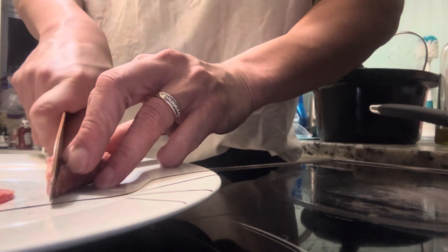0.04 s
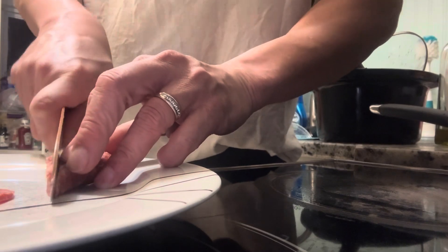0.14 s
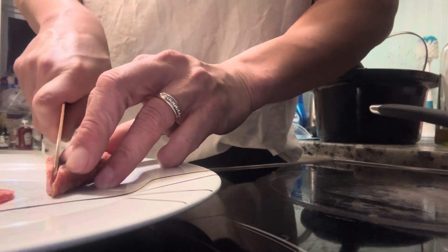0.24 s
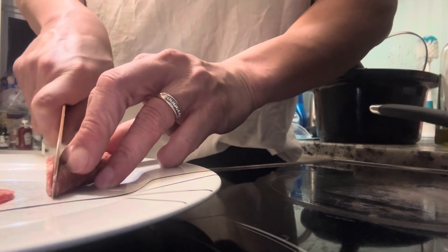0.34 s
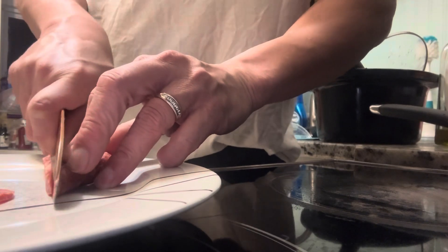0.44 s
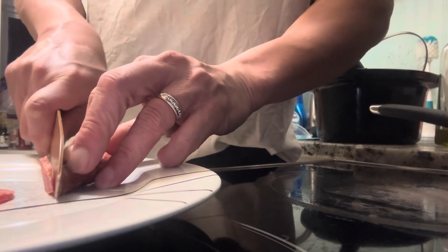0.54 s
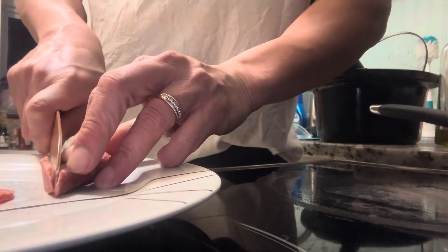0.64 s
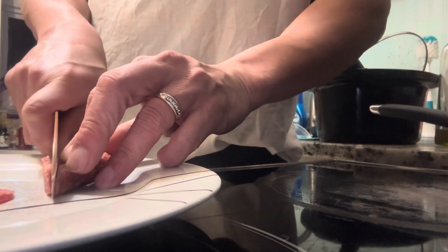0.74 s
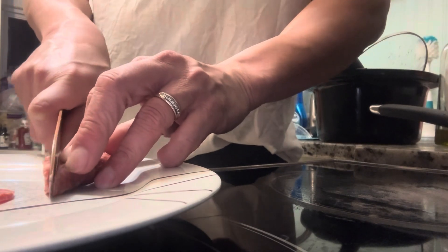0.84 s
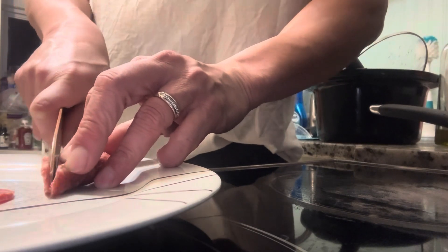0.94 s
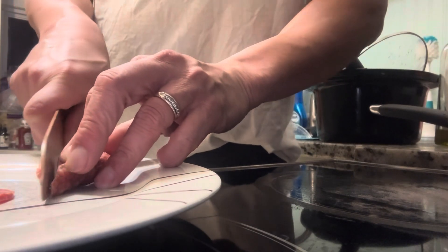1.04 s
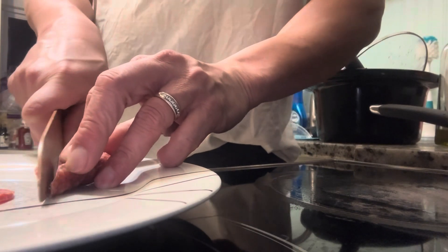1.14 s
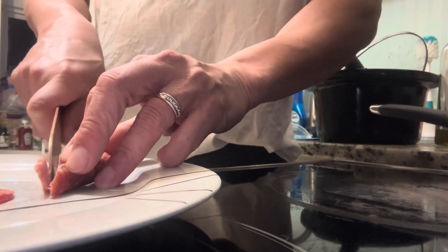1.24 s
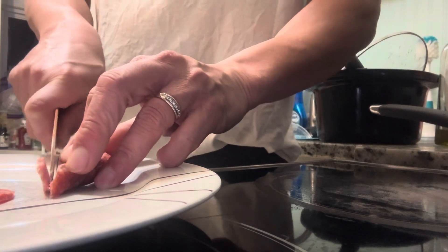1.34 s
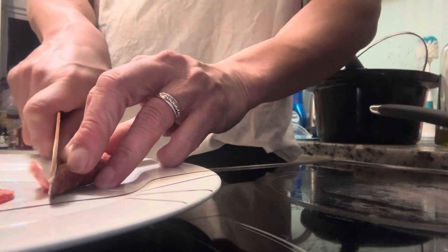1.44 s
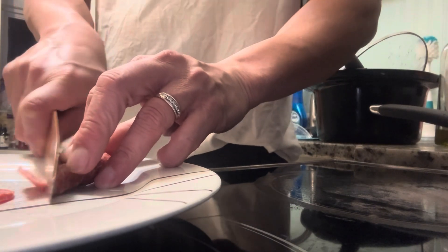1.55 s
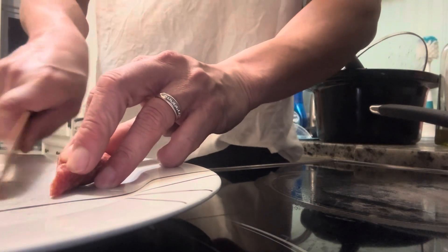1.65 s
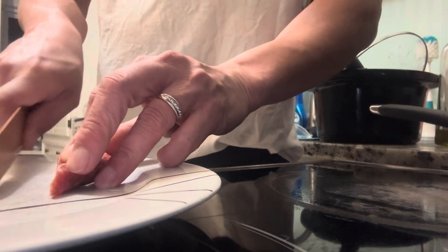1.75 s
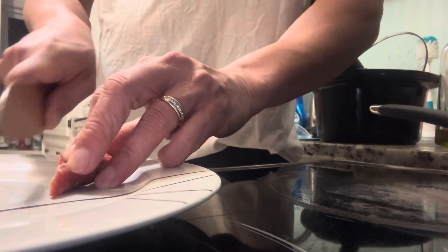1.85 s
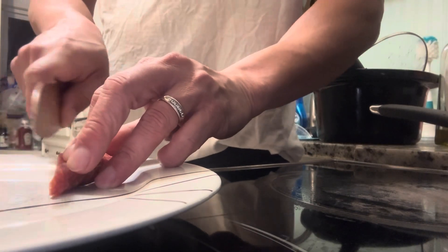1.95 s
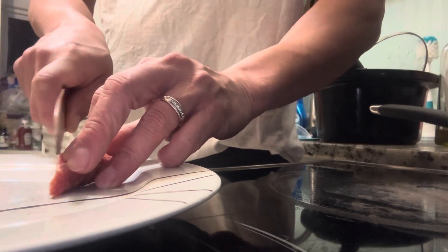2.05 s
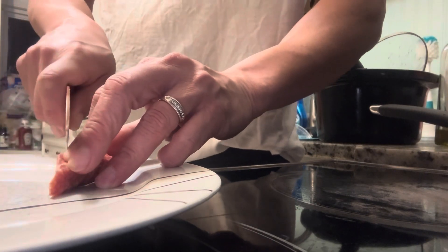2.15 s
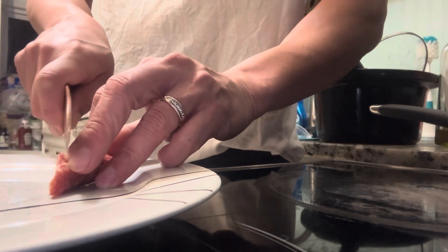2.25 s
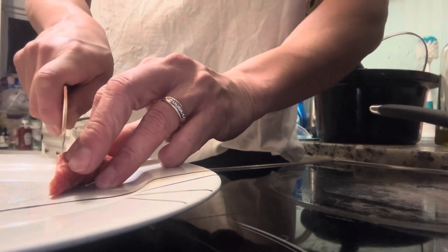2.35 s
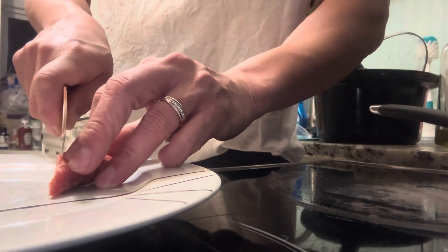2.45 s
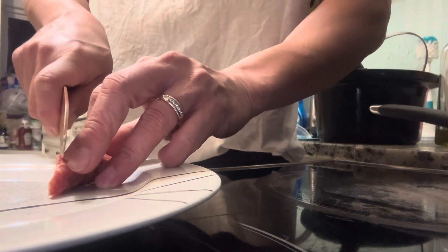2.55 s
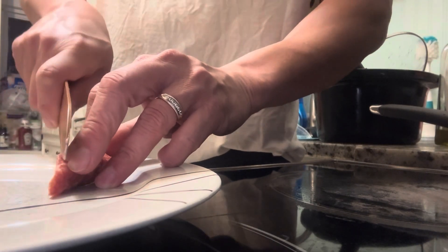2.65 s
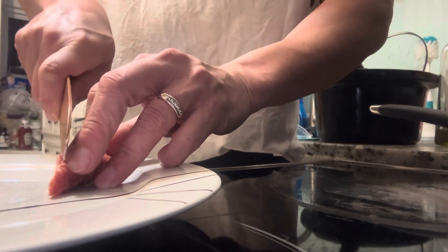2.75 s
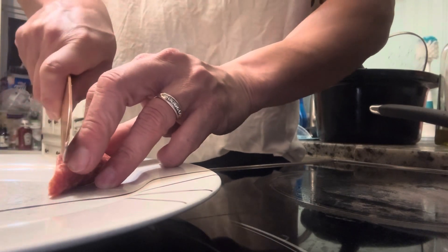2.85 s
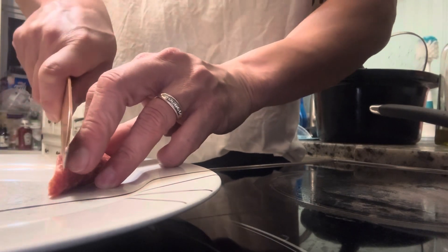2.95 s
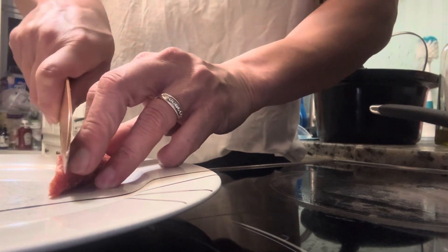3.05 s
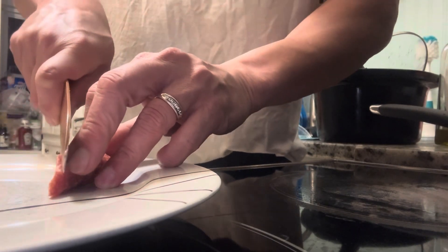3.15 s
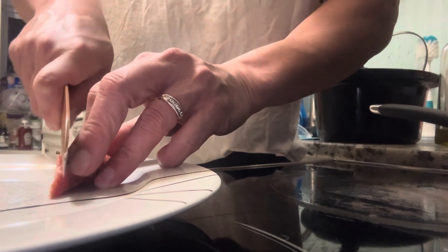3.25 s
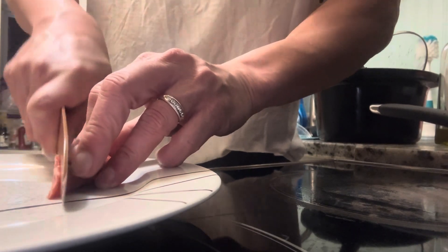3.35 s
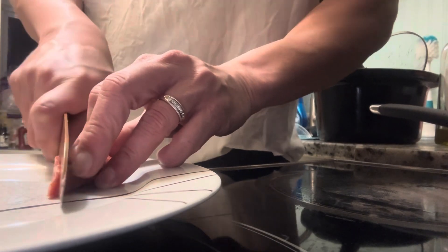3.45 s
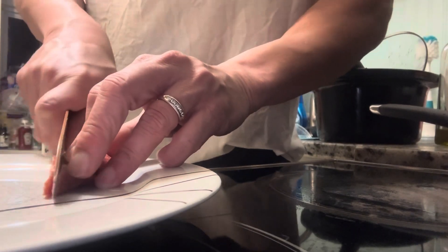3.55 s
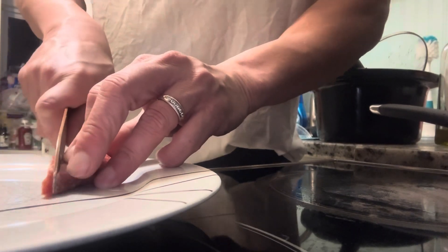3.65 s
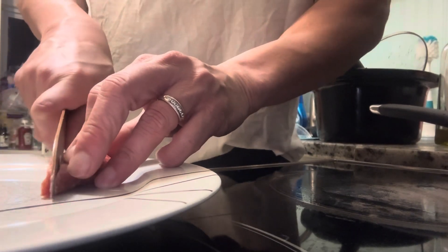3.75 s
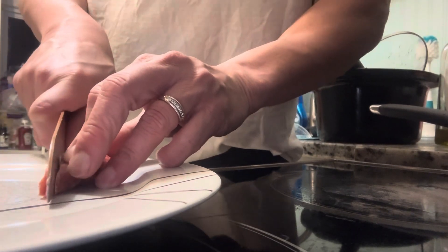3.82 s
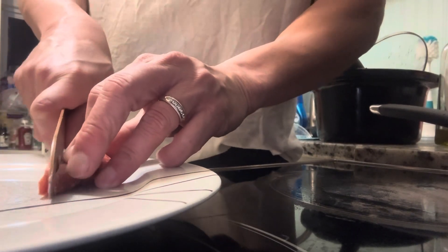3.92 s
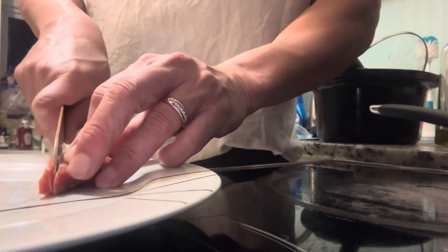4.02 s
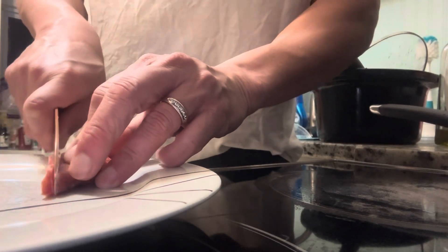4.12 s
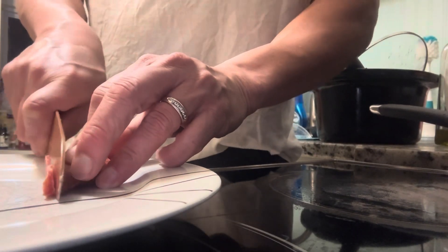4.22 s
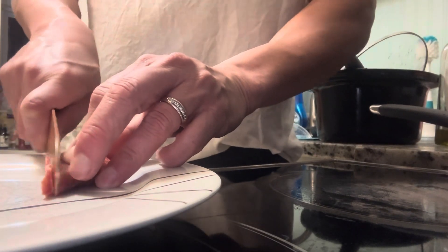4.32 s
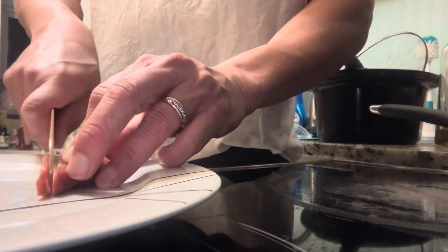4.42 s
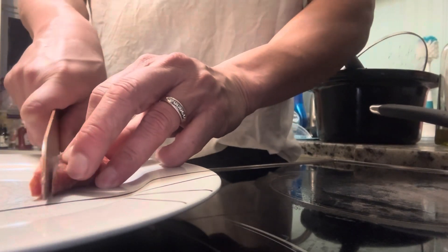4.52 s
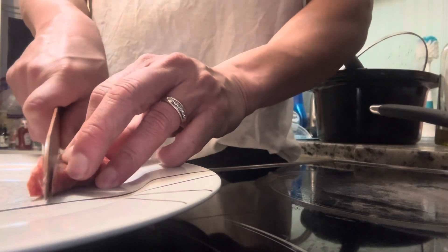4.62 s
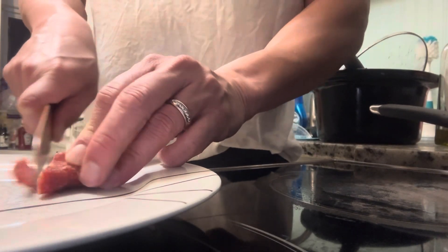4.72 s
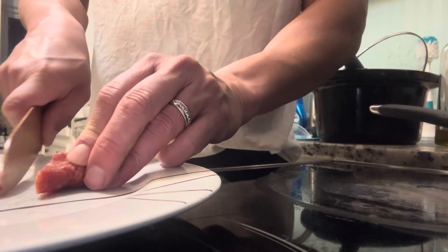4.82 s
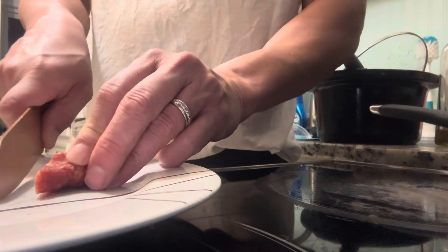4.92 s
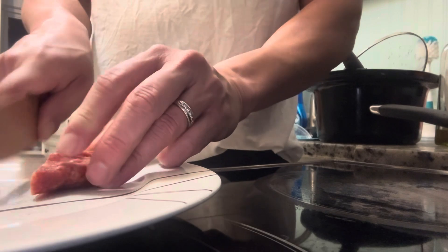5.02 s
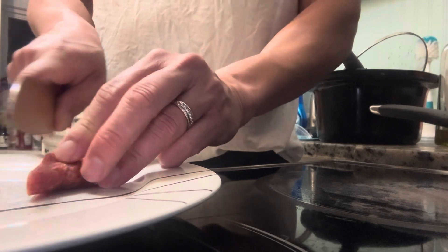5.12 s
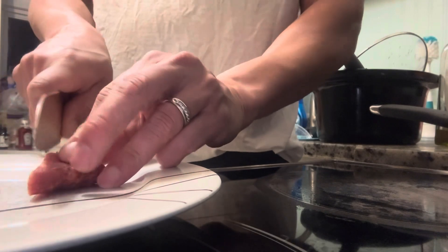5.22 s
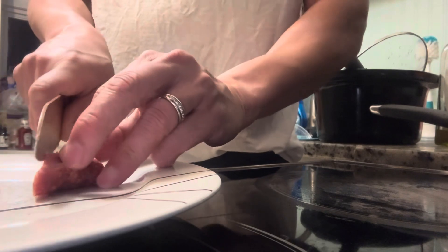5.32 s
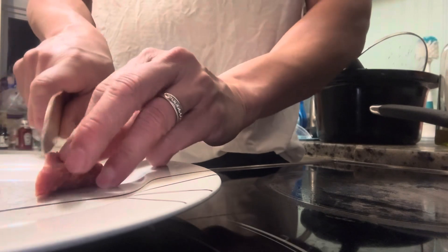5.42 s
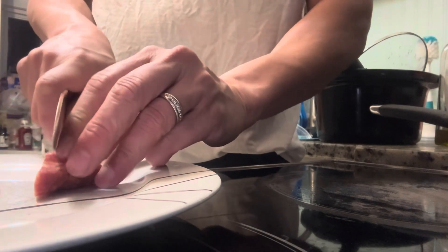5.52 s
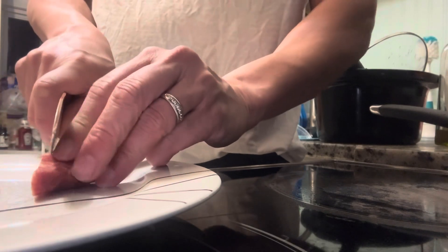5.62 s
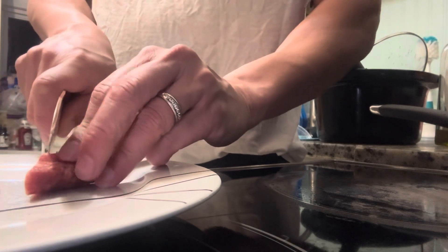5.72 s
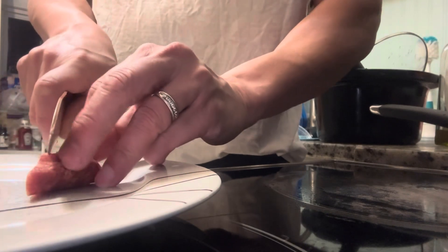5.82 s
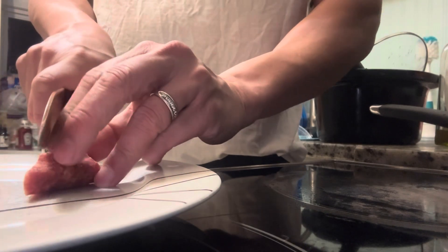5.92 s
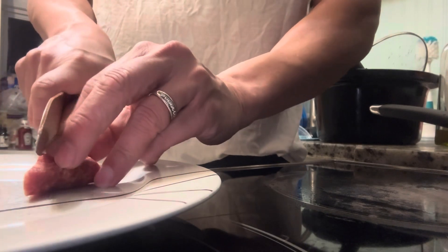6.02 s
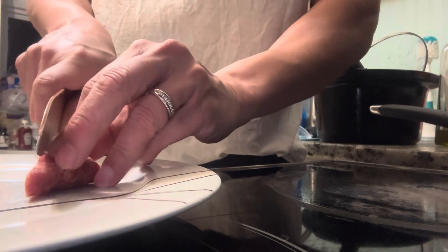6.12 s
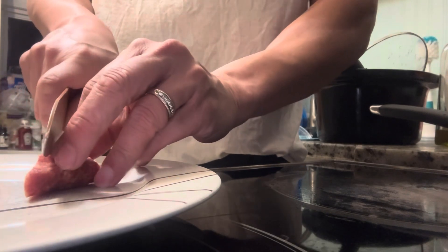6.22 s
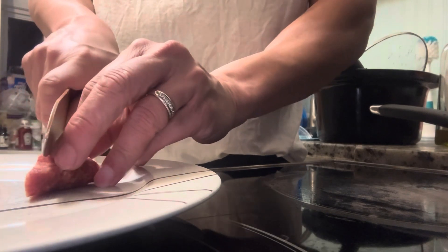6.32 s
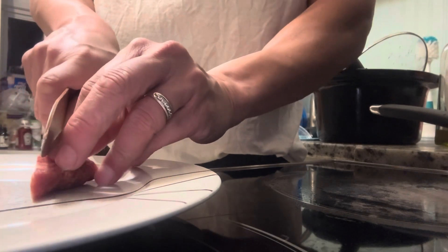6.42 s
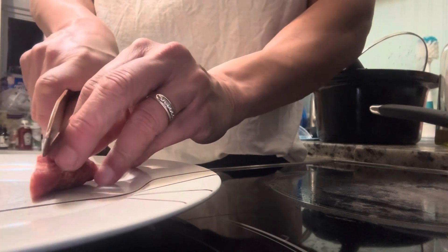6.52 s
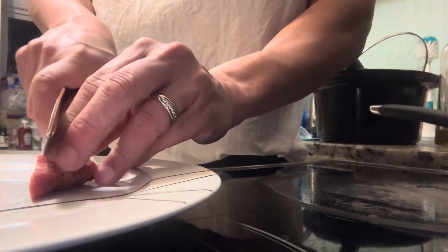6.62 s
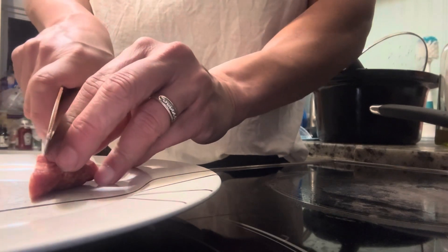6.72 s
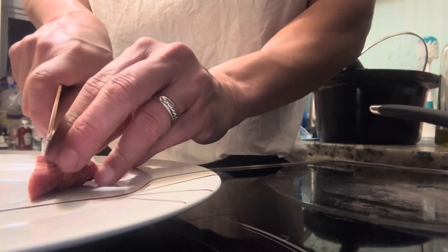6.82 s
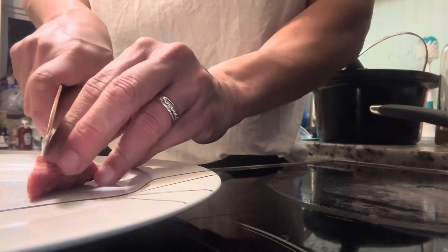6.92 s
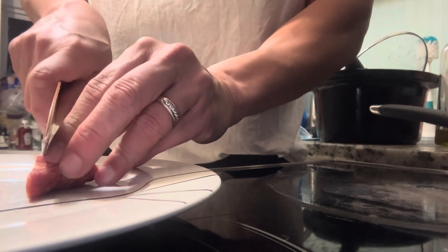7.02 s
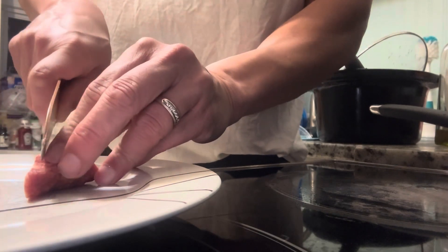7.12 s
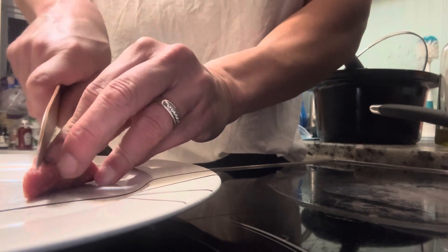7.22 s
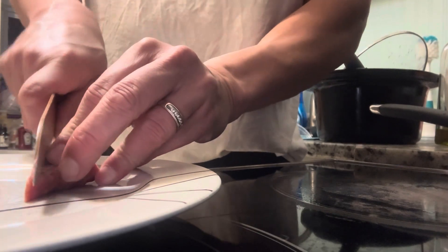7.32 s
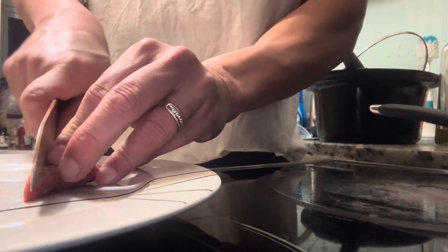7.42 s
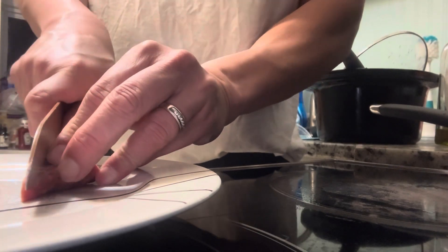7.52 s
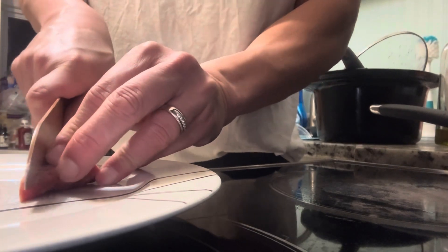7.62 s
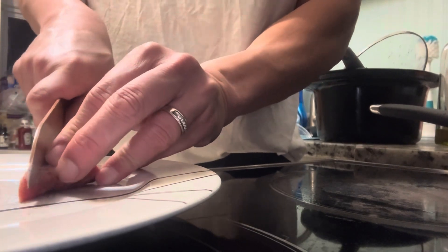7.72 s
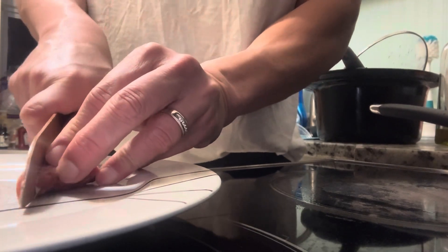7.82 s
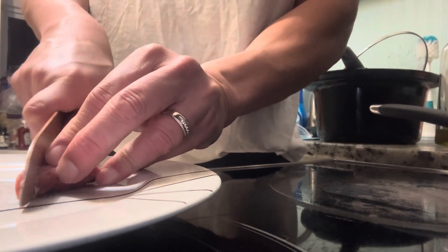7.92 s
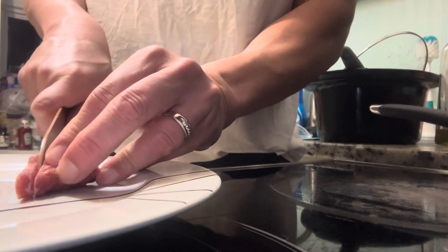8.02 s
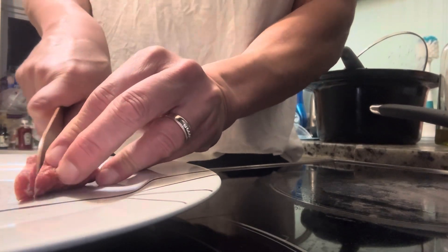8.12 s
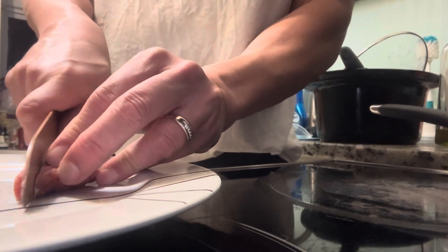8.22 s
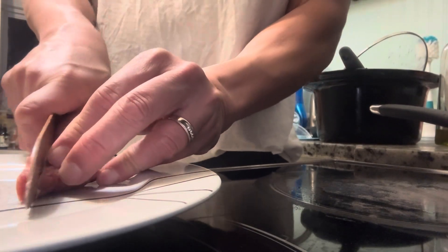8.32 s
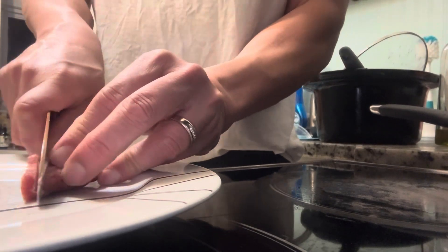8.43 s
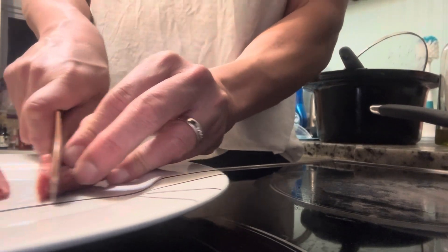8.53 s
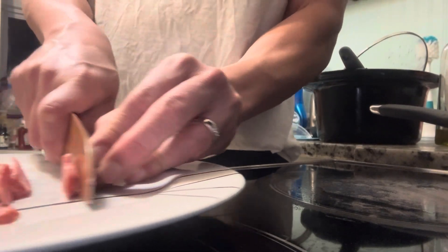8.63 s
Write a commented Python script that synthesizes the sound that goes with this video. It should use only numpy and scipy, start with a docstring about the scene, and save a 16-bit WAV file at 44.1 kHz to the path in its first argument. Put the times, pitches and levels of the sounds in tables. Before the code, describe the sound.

Soft, moist sawing strokes come unevenly as a knife cuts sausage on a plate near the microphone. Early on, a cluster of sharp clicks and a short scrape push a slice aside. More strokes follow with low thumps, small wet snaps and separate knocks of steel on china, then a quieter stretch and a few last clacks. The small kitchen adds a brief ring and a faint steady hum.

```python
"""A kitchen knife saws slowly through a sausage on a china plate on a glass cooktop, close up.
Over a low hum, the hands rumble, the blade rubs through meat, pushes thump the cooktop, the casing
snaps. From 1 s the edge knocks and squeaks and the plate rocks; near 1.55 s the blade sweeps the
slice aside. More strokes follow, dragging over the glaze; the plate's foot ticks at 4.4 s and twice
around 8 s. The small kitchen rings briefly throughout."""
import sys
import numpy as np
from scipy import signal
from scipy.fft import rfft, irfft, next_fast_len
from scipy.io import wavfile
from scipy.ndimage import uniform_filter1d

SR = 44100
rng = np.random.default_rng(int(sys.argv[2]) if len(sys.argv) > 2 else 0)


def store_wav(level_fs):
    """Save 16-bit WAV to argv[1]."""
    pcm = np.round(np.clip(np.atleast_2d(level_fs), -1, 1) * 32767)
    wavfile.write(sys.argv[1], SR, pcm.T.astype(np.int16))


N = 381906
TIME = np.arange(N) / SR
# blade and plate pressed together, quickly damped: pitch_hz, level_db, t60_s
PRESSED_MODES = [(1230, -2, 0.016), (1678, -0.5, 0.053), (2097, 3, 0.11), (2275, 4, 0.028),
                 (2760, -7.5, 0.031), (3274, -1.5, 0.036), (3590, -3.5, 0.031), (3940, -2.5, .04),
                 (4030, -3.5, 0.038), (5540, -7, 0.022), (6327, -8, 0.032), (7440, -6.5, 0.013)]


def undb(db):
    """Decibels to gain."""
    return 10 ** (np.asarray(db) / 20)


def unit(x):
    """Scale to rms 1."""
    return x / np.sqrt(np.mean(x ** 2))


def fade(t, t60_s):
    """Exponential decay, 60 dB in t60_s."""
    return np.exp(-np.log(1000) * t / max(t60_s, 1e-3))


def swell(t, peak_s):
    """Rise to 1 at peak_s, then decay."""
    age = t / max(peak_s, .004)
    return (age * np.exp(1 - age)) ** 1.3


def wobble(rate_hz, t=TIME):
    """Smooth random curve, spread near 1."""
    count = int(t[-1] * rate_hz) + 2
    return np.interp(t * rate_hz, np.arange(count), rng.standard_normal(count))


def stereo_noise(shared):
    """Two noises with a common share of power."""
    common, *own = rng.standard_normal((3, N))
    return np.sqrt(shared) * common + np.sqrt(1 - shared) * np.array(own)


def colour(x, points):
    """Minimum-phase filter through (freq_hz, gain_db) points."""
    size = next_fast_len(x.shape[-1] + 4096)
    size += size % 2
    hz, db = np.transpose(points)
    log_hz = np.log(np.fft.rfftfreq(size, 1 / SR) + 1)
    cepstrum = irfft(np.interp(log_hz, np.log(hz), db) * np.log(10) / 20)
    cepstrum[1:size // 2] *= 2
    cepstrum[size // 2 + 1:] = 0
    return irfft(rfft(x, size) * np.exp(rfft(cepstrum)))[..., :x.shape[-1]]


def treble_of(x):
    """The band that brightness acts on."""
    return signal.sosfiltfilt(signal.butter(2, 4800, "high", fs=SR, output="sos"), x)


def add(out, start_s, sound):
    """Mix a sound in at start_s."""
    start = max(int(start_s * SR), 0)
    out[..., start:start + sound.shape[-1]] += sound[..., :N - start]


def pan(db):
    """Channel gains for a left minus right level."""
    return unit(undb(np.array([[db], [-db]]) / 2))


def convolve(x, response):
    """Apply a two-channel impulse response."""
    return signal.oaconvolve(np.atleast_2d(x), response, axes=-1)[:, :N]


def ringing(modes):
    """Decaying modes of a struck body, amplitudes scaled to norm 1."""
    t = TIME[:SR // 6]
    ring = sum(rng.choice([-1, 1]) * undb(db) * fade(t, t60_s) * np.sin(2 * np.pi * hz * t)
               for hz, db, t60_s in modes)
    return ring / np.linalg.norm([undb(db) for _, db, _ in modes])


def background(air_db=-59):
    """Steady room noise under the wavering hum of fridge and mains."""
    # room noise spectrum: freq_hz, gain_db
    spectrum = [(20, -23), (55, -8.5), (130, -13), (350, -4.5), (700, -37.5), (1050, -39), (2000, -42.5),
                (4000, -38), (7500, -37.5), (10500, -72), (13300, -35), (15000, -56.5)]
    # fridge and mains tones: pitch_hz, rms_db
    tones = [(57, -65.5), (118, -63), (3445, -87), (6885, -93)]
    air = unit(colour(stereo_noise(shared=0.079), spectrum)) * undb(air_db + 0.35 * wobble(26))
    hum = 0
    for hz, db in tones:
        amplitude = np.sqrt(2) * undb(db + 2 * wobble(2.3))
        hum += amplitude * np.sin(2 * np.pi * hz * TIME + .6 * wobble(1.8))
    return air + hum


def movement(peak_s, level_db, rise_s, fall_s, drop_db=16.5, roundness=1.1):
    """Gain of one hand movement: speeds up, peaks, slows down."""
    span = slice(*np.searchsorted(TIME, [peak_s - 5 * rise_s, peak_s + 5 * fall_s]))
    away = np.maximum((peak_s - TIME[span]) / rise_s, (TIME[span] - peak_s) / fall_s)
    gain = np.zeros(N)
    gain[span] = undb(level_db - drop_db * away ** roundness)
    return gain


def slips(rate_hz, scatter_db, patchy_db, patch_hz):
    """Stick-slip: tiny uneven clicks that come in patches."""
    clicks = (rng.random(N) < rate_hz / SR) * rng.choice([-1, 1], N)
    sizes = undb(scatter_db * rng.standard_normal(N))
    return unit(clicks * sizes * undb(patchy_db * wobble(patch_hz)))


def tip_echo(x, mean_s=0.00055, roam_s=.00007):
    """The contact point wanders along the blade, so the tip's echo shifts the colour."""
    index = np.arange(N)
    lag = np.abs(mean_s + roam_s * wobble(11)) * SR
    return unit(x + 0.42 * np.interp(index - lag, index, x))


def pressed(force, modes_db, drift_s=.0012):
    """Friction keeps the pressed modes ringing; their pitch drifts as the edge moves."""
    ring = signal.oaconvolve(force, ringing(PRESSED_MODES))[:N]
    drifting = np.interp(TIME + drift_s * wobble(16), TIME, ring)
    return unit(force + undb(modes_db) * unit(drifting))


def plate(force, ring_db, spread_s=0.00063):
    """The plate passes a force on, smeared; blade and china ring on, differently per side."""
    # free modes of blade and plate: pitch_hz, level_db, t60_s
    modes = [(1390, -6, .18), (1546, -4, .12), (1616, -1.5, .14), (1690, -4, .13), (2200, -11, .1),
             (2735, 3, .16), (3175, -5, .16), (3461, -3, .18), (3740, -9, .16), (4080, -13, .14),
             (4620, -9, .2), (5600, -4, .18), (6538, 0, .16), (6616, -1, .16), (7330, -12.5, .2),
             (8635, -13.5, .25), (11700, -19, .2), (12650, -20, .2)]
    t = TIME[:SR // 3]
    hz = np.fft.rfftfreq(512, 1 / SR)
    knots_hz = np.linspace(0, SR / 2, num=90)
    # bending waves of each pitch take their own time to the rim
    delay_s = np.interp(hz, knots_hz, rng.random(len(knots_hz)) * spread_s)
    direct = irfft(np.exp(-2j * np.pi * np.cumsum(delay_s) * hz[1]))
    direct[len(direct) // 2:] = 0
    response = []
    for _ in range(2):
        ring = sum(undb(db) * fade(t, t60_s) * np.cos(2 * np.pi * (pitch_hz * t + rng.random()))
                   for pitch_hz, db, t60_s in modes)
        ring *= undb(ring_db) / np.linalg.norm(ring)
        ring[0] += 1
        response.append(np.convolve(ring, direct))
    return convolve(force, np.array(response))


def sawing():
    """The blade hisses through moist meat; tearing fibres crunch. Returns sound, friction envelope."""
    # blade strokes: peak_s, level_db, rise_s, fall_s, bright_db
    strokes = [(0.01, -40, 0.06, 0.018, -11), (0.165, -50.5, 0.12, 0.065, 1),
               (0.347, -45.5, .08, 0.12, 1.5), (0.76, -59, 0.23, 0.22, 3.5), (1.0, -59.5, 0.067, 0.64, 4),
               (1.246, -49, 0.072, 0.022, -2), (1.39, -48, 0.046, 0.11, 1.5),
               (2.885, -59.5, 0.06, 0.06, 2.5), (2.99, -57, 0.11, 0.25, 3.5),
               (3.274, -47, 0.052, 0.16, -17), (3.38, -47.5, 0.082, 0.15, 7), (3.768, -52.5, 0.02, 0.11, 5),
               (3.897, -48.5, 0.04, 0.041, 1.5), (4.091, -59.5, 0.079, 0.14, 4),
               (4.3, -59, 0.098, 0.3, 4.5), (4.46, -47, 0.038, 0.082, 6), (5.53, -60.5, 0.046, 0.05, -8),
               (5.76, -66.5, 0.026, 0.32, -3.5), (6.34, -60.5, 0.13, 0.088, -1.5),
               (6.691, -65, 0.076, 0.1, -7.5), (7.02, -66.5, 0.084, 0.062, 2),
               (7.219, -53.5, 0.059, 0.16, -6), (7.61, -74, 0.05, 0.1, 7), (7.77, -44.5, 0.042, 0.028, 3.5),
               (7.94, -54, 0.15, 0.12, 7.5), (8.183, -49, 0.17, 0.093, 3), (8.285, -56, 0.019, 0.046, 9)]
    # spectrum of steel on meat: freq_hz, gain_db
    spectrum = [(150, -6.5), (370, 5), (1000, -1), (1350, -0.5), (1780, 3.5), (2050, 0), (2300, 2),
                (2480, -0.5), (2680, 3), (2900, -1), (3200, 1), (3400, 0), (3700, 3), (4300, 0), (4900, -5),
                (5650, -2), (6200, -5), (6800, -4), (7900, -6.5), (8700, -8), (10200, -31), (11800, -18),
                (15500, -36)]
    rub = slips(rate_hz=5000, scatter_db=-0.5, patchy_db=0.5, patch_hz=60)
    crunch = undb(-1) * slips(rate_hz=240, scatter_db=4.2, patchy_db=3, patch_hz=35)
    cut = pressed(tip_echo(unit(colour(rub + crunch, spectrum))), modes_db=-11)
    treble = treble_of(cut)
    force = friction = 0
    for *move, bright_db in strokes:
        gain = movement(*move)
        force += gain * (cut + (undb(bright_db) - 1) * treble)
        friction += gain
    return plate(force * undb(1), ring_db=-17, spread_s=0.00054) * pan(-6), friction


def hands(friction, rest_db=-61.5, effort_db=-23, blur_s=0.033):
    """Fingers and meat shift on the plate: a dull rumble that grows with sawing effort."""
    # changes of grip: peak_s, level_db, rise_s, fall_s
    grips = [(0.01, -37.5, 0.1, 0.082), (0.72, -46.5, 0.17, 0.13), (2.239, -62, .15, 0.19),
             (3.02, -41, 0.065, 0.08), (4.56, -47, 0.13, 0.6), (7.032, -61, 0.088, 0.063),
             (8.58, -43, 0.51, 0.91)]
    # rumble spectrum: freq_hz, gain_db
    spectrum = [(25, -15), (55, -0.5), (90, 2.5), (170, -3.5), (280, -6.5), (450, -12.5), (700, -14.5),
                (1000, -28.5), (2000, -35.5), (5000, -59.5)]
    rumble = unit(colour(stereo_noise(shared=0.062) * undb(4 * wobble(25)), spectrum))
    effort = np.sqrt(np.abs(uniform_filter1d(friction, size=int(blur_s * SR))))
    gripping = sum(movement(*grip) for grip in grips)
    press = undb(rest_db) + np.hypot(undb(effort_db) * effort, gripping)
    return rumble * press * undb(3) * pan(-1.5)


def finger_ticks(level_db=-85):
    """Greasy fingers stick to the meat and let go in faint, scattered ticks."""
    # tick spectrum: freq_hz, gain_db
    spectrum = [(400, -8), (1000, -3), (1800, 0), (2800, -5), (4000, -7), (8000, -14), (10000, -35)]
    t = TIME[:SR // 40]
    ticks = slips(rate_hz=70, scatter_db=2.5, patchy_db=2, patch_hz=5)
    moist = signal.oaconvolve(ticks, rng.standard_normal(len(t)) * fade(t, 0.0047))[:N]
    rustle = tip_echo(colour(moist, spectrum), roam_s=.0002)
    return plate(rustle * undb(level_db), ring_db=-25) * pan(-2)


def flesh_damping(t):
    """Gain of a swing that flesh damps unevenly."""
    return 1 + 0.57 * wobble(230, t)


def thumps(glide_hz=200, glide_s=.0055, knock_hz=258, frame_hz=76, rebound_hz=82.5):
    """Cooktop bending waves: high ones arrive first, the pane swings low, the stove frame follows."""
    # pushes on the plate, and the stove frame swinging back after some of them (1.66, 3.34, 7.83 s): start_s,
    # level_db, pitch_hz, knock_db, pan_db
    pushes = [(0.044, -34, 58.3, -52, -6.5), (0.145, -31, 111.6, -54.5, -9),
              (0.373, -20.5, 100.2, -39.5, -5), (1.032, -31.5, 108.6, -31.5, -4.5),
              (1.274, -29, 95.6, -25.5, 3), (1.612, -27.5, 95, -19.5, -12), (1.664, -30.5, 88.2, -46, -3),
              (2.349, -22.5, 113.5, -31.5, -7), (3.265, -26, 137.8, -25.5, -3),
              (3.344, -19.5, 84.36, -34.5, -9), (3.776, -22, 95.2, -58.5, -8),
              (4.363, -19.5, 93.6, -21.5, -5), (4.908, -30, 111.8, -28.5, -6.5),
              (5.516, -15.5, 114.5, -19, -8), (5.71, -31, 117.4, -44.5, -17),
              (5.922, -20.5, 102.3, -34, -2.5), (6.179, -25.5, 115, -32.5, -4.5),
              (6.642, -23.5, 109.8, -45.5, -2), (7.196, -29.5, 130.4, -19, -3),
              (7.286, -26.5, 103.6, -46.5, -1), (7.767, -18, 88, -29.5, -4.5),
              (7.834, -27.5, 82.2, -42.5, -4), (7.986, -29.5, 111.7, -51, -6),
              (8.385, -23, 126, -36.5, -3.5), (8.523, -28.5, 97.9, -62, -3)]
    out, t = np.zeros((2, N)), TIME[:SR // 3]
    late = np.maximum(t - .053, 0)  # rebound's clock
    for start_s, db, hz, knock_db, pan_db in pushes:
        detune = 1 + 0.04 * rng.standard_normal(2)
        # a soft push builds slowly and hardly starts the fast waves
        hardness = np.clip((knock_db - db + 27.5) / 16, 0, 1)
        cycles = hz * t + hardness * glide_hz * glide_s * (1 - np.exp(-t / glide_s))
        pane = swell(t, 0.025 - 0.011 * hardness) * np.sin(2 * np.pi * cycles) * flesh_damping(t)
        frame = undb(-10) * swell(t, 0.014) * np.sin(2 * np.pi * frame_hz * detune[0] * t)
        rebound_gain = hardness * undb(-0.58 * max(hz - 93.5, 0))  # weaker for higher thumps
        rebound = rebound_gain * swell(late, 0.011) * np.sin(2 * np.pi * rebound_hz * late)
        knock_gain = undb(knock_db + 5) * (1 - np.exp(-t / 0.001)) * fade(t, 0.05)
        knock = knock_gain * np.sin(2 * np.pi * knock_hz * detune[1] * t)
        add(out, start_s, pan(pan_db) * (undb(db) * (pane + frame + rebound) + knock))
    return colour(out, [(100, -1), (135, -2), (165, -11), (200, -4), (250, 1.5)])


def pops(events, t60_s, width_octaves, skirt_db, gain_db):
    """Short noise bursts, each centred on its own pitch."""
    out, t = np.zeros(N), TIME[:SR // 20]
    ratio = 2 ** width_octaves
    for start_s, db, hz in events:
        hump = [(hz / ratio ** 2, 2 * skirt_db), (hz / ratio, skirt_db), (hz, 0),
                (hz * ratio, skirt_db), (hz * ratio ** 2, 3 * skirt_db)]
        burst = colour(rng.standard_normal(len(t)) * fade(t, t60_s), hump)
        add(out, start_s, burst / np.abs(burst).max() * undb(db + gain_db))
    return out


def snaps_and_smacks():
    """Bright snaps, mostly the casing rupturing; the meat lets go with softer wet smacks."""
    # short bright snaps (the casing; the sharp top of the knock at 7.76 s): start_s, level_db, pitch_hz
    bright_snaps = [(0.1595, -43, 3570), (0.632, -49, 4060), (1.1773, -41, 3750), (1.3738, -31.5, 5600),
                    (1.4198, -40, 5403), (2.73, -75, 2500), (3.2914, -53, 5000), (3.7534, -31.5, 3728),
                    (3.836, -37, 4500), (3.893, -35, 3600), (4.4394, -33.5, 7400), (4.6154, -37.5, 2724),
                    (5.0243, -53.5, 6750), (5.4516, -46, 5930), (5.8406, -33, 5890), (5.9205, -35, 6060),
                    (6.0985, -49, 7350), (6.1859, -44.5, 7250), (6.268, -59, 2200), (6.448, -57, 6010),
                    (7.763, -24, 12000), (7.8441, -37, 4030), (8.1903, -37, 3720)]
    # meat parts from blade and plate: start_s, level_db, pitch_hz
    partings = [(0.4374, -49.5, 1150), (0.821, -45.5, 1730), (1.0874, -42.5, 1190), (1.3723, -35.5, 1640),
                (1.4725, -44, 1280), (1.93, -55, 1610), (2.3456, -56.5, 1477), (4.5473, -47.5, 1287),
                (5.8422, -48, 1753), (5.9218, -40, 2325), (8.0395, -44, 1268), (5.518, -48, 1490),
                (7.44, -52, 1609), (8.313, -54, 1680)]
    snaps = pops(bright_snaps, t60_s=0.018, width_octaves=2.3, skirt_db=-7.5, gain_db=-3)
    snaps = colour(snaps, [(8500, 8), (10000, -19.5), (12000, -4.5)])
    smacks = pops(partings, t60_s=0.02, width_octaves=0.55, skirt_db=-13, gain_db=1.5)
    return (plate(snaps, ring_db=-22, spread_s=0.0021) * pan(-2.8)
            + plate(smacks, ring_db=-23.5, spread_s=0.0042) * pan(-1.8))


def clack(low_hz, high_hz, favour_db=10, reach_octaves=0.25):
    """Pressed modes, louder near the two pitches that the contact point favours."""
    modes = []
    for hz, db, t60_s in PRESSED_MODES:
        octaves = min(abs(np.log2(hz / low_hz)), abs(np.log2(hz / high_hz)))
        modes.append((hz, db + favour_db * np.exp(-(octaves / reach_octaves) ** 2), t60_s))
    return ringing(modes)


def knocks(bite_s=.002, clack_lead_s=.001):
    """The edge bites into the glaze, strikes home, chatters and sets blade and plate clacking."""
    # edge meets plate: start_s, chatter_db, body_db, edge_db, approach_t60_s, decay_t60_s,
    # clack_db, low_hz, high_hz
    hits = [(1.0056, -27.5, -37.5, -35.5, 0.004, 0.026, -32, 1688, 3608),
            (1.277, -32, -38, -42.5, 0.012, 0.025, -24, 1676, 3163),
            (1.2872, -43, -50, -46.5, 0.0067, 0.038, -40, 1704, 6463),
            (1.547, -23, -46, -30, 0.062, 0.07, -31, 1596, 5600),
            (1.5605, -26.5, -50, -32.5, .006, 0.016, -31.5, 2812, 5640),
            (1.5813, -13.5, -45.5, -27.5, 0.0042, .022, -19, 1725, 6620),
            (1.64, -23, -39, -33, .006, 0.012, -32.5, 1421, 3500),
            (1.6534, -9, -41, -24.5, .008, 0.015, -11.5, 2816, 3475),
            (3.337, -11.5, -21.5, -19, 0.013, 0.0078, -12.5, 2330, 3170),
            (3.352, -29, -44, -46.5, 0.0071, .04, -30, 2258, 1702),
            (4.36, -13.5, -17.5, -52, 0.0053, 0.014, -13, 1760, 3234),
            (4.3691, -16, -25, -46, 0.005, 0.014, -19.5, 1750, 4095),
            (4.676, -31, -60, -59, .005, .02, -42.5, 1700, 3800),
            (4.6963, -21.5, -58, -44, 0.0071, 0.05, -36, 2100, 2800),
            (4.7383, -38, -66, -49, .005, .02, -45.5, 2300, 3800),
            (7.212, -31.5, -36.5, -51.5, .014, 0.077, -41, 1745, 2830),
            (7.761, -18.5, -25.5, -46, 0.033, 0.035, -15.5, 1317, 1700),
            (7.766, -38.5, -24, -46, 0.042, 0.0083, -28.5, 1700, 2750),
            (7.9801, -30.5, -54, -41.5, 0.0089, 0.018, -39.5, 1660, 2280),
            (8.166, -30, -43.5, -45.5, 0.005, 0.021, -40, 1560, 3700)]
    # chatter spectrum: freq_hz, gain_db
    spectrum = [(150, -3.5), (400, -2.5), (780, -7.5), (980, -12), (1250, -3.5), (1620, 8), (1950, 3),
                (2300, 2), (3200, -1.5), (4000, -4.5), (4900, -10.5), (6600, -14), (8600, -18.5),
                (10000, -39), (13000, -33.5), (15000, -41.5)]
    out, t = np.zeros(N), TIME[:SR // 16] - 1 / 64
    for start_s, chatter_db, body_db, edge_db, approach_s, decay_s, clack_db, low_hz, high_hz in hits:
        pressure = np.where(t < 0, fade(np.abs(t), approach_s), fade(np.abs(t), decay_s))
        force = rng.choice([-1, 1], len(t)) * pressure
        force[np.argmax(pressure)] += undb(-1) * np.linalg.norm(pressure)  # the strike
        chatter = colour(force, spectrum)
        bands = [((120, 1000), body_db + 1), ((1000, 4800), chatter_db - 9), ((4800, 16000), edge_db)]
        for band_hz, db in bands:
            part = signal.sosfilt(signal.butter(3, band_hz, "band", fs=SR, output="sos"), chatter)
            add(out, start_s + bite_s + t[0], unit(part) * undb(db - 9.5))
        add(out, start_s + bite_s - clack_lead_s, clack(low_hz, high_hz) * undb(clack_db))
    return plate(out, ring_db=-24, spread_s=0.00065) * pan(-3)


def squeaks(waver=0.037):
    """The slips lock briefly into a wavering tone."""
    # the wet blade catches: start_s, level_db, pitch_hz, rise_s, t60_s
    catches = [(1.24, -40, 2660, 0.0045, 0.038), (1.546, -24, 1630, .004, 0.029),
               (1.553, -19.5, 2783, 0.0087, 0.017), (1.597, -28.5, 3410, 0.0046, 0.036),
               (2.451, -60.5, 1884, .002, 0.031), (2.487, -53.5, 2006, 0.0033, 0.029),
               (3.893, -34, 3790, 0.0033, 0.031), (4.926, -33, 1694, .005, 0.042),
               (8.27, -52.5, 3480, .015, .1)]
    out, t = np.zeros(N), TIME[:SR // 10]
    for start_s, db, hz, rise_s, t60_s in catches:
        cycles = np.cumsum(hz * (1 + waver * wobble(600, t))) / SR
        envelope = np.minimum(t / rise_s, 1) * fade(np.maximum(t - rise_s, 0), t60_s)
        add(out, start_s, undb(db) * envelope * np.sin(2 * np.pi * cycles))
    return plate(out, ring_db=-34) * pan(-5)


def clunks(rise_s=.0015, t60_s=.055):
    """The plate rocks for a few cycles; its foot rattles dully on the glass."""
    # firm blows that rock the plate: start_s, level_db, pitch_hz
    blows = [(1.28, -15, 303.8), (1.306, -34, 322), (1.616, -13, 290), (1.633, -20.5, 261.7),
             (1.642, -22, 779.3), (3.274, -28.5, 358.4), (3.351, -24.5, 214.4), (3.365, -23.5, 330),
             (4.362, -8, 295), (4.371, -19, 380.2), (5.516, -27.5, 251.9), (7.763, -20.5, 603.6),
             (7.764, -22.5, 340.2), (7.846, -33, 330), (7.863, -29.5, 543), (8.312, -36, 596),
             (8.376, -31.5, 589), (8.395, -34, 696)]
    # rattle spectrum: freq_hz, gain_db
    spectrum = [(160, -12), (240, -1.5), (310, 7), (390, -2.5), (480, -3), (780, -2), (1050, -14.5)]
    rattle = colour(pops(blows, t60_s=0.062, width_octaves=1.4, skirt_db=-12, gain_db=1.5), spectrum)
    rock, t = np.zeros(N), TIME[:SR // 10]
    envelope = np.minimum(t / rise_s, 1) * fade(t, t60_s)
    for start_s, db, hz in blows:
        add(rock, start_s, undb(db + 0.5) * envelope * np.sin(2 * np.pi * hz * t) * flesh_damping(t))
    return rock + plate(rattle, ring_db=-17.5, spread_s=0.0018)


def sweep(start_s=1.546, hold_s=0.079, level_db=-28, growth_db_per_s=23.5):
    """Gain as the freed blade sweeps the slice aside, pressing ever harder."""
    age = TIME - start_s
    attack = fade(np.maximum(-age, 0), t60_s=0.048)
    release = fade(np.maximum(age - hold_s, 0), t60_s=0.076)
    growth_db = growth_db_per_s * np.clip(age, 0, hold_s)
    judder_db = 0.5 * wobble(220)  # the edge catches and lets go
    return attack * release * undb(level_db + growth_db + judder_db)


def scrapes():
    """The edge grates over the glaze, ringing most when no meat damps it."""
    # damped drags of the edge: peak_s, level_db, rise_s, fall_s, bright_db
    drags = [(3.353, -33, .008, 0.05, -21), (4.619, -49, 0.011, 0.086, -3.5),
             (4.703, -39, 0.069, 0.062, -3), (4.755, -41.5, 0.037, 0.07, -9),
             (4.86, -49.5, 0.04, 0.073, -5), (4.93, -48, 0.024, 0.01, -4.5), (8.441, -52, 0.083, 0.19, 0),
             (8.65, -47.5, 0.14, .1, -1.5)]
    # spectrum of steel on glaze: freq_hz, gain_db
    spectrum = [(400, -4.5), (780, -1), (1000, -9.5), (1350, -5), (1650, -0.5), (1900, -8), (2200, 2),
                (2700, -1.5), (3000, -5), (3800, -2.5), (4400, -3.5), (4950, -9.5), (5600, -9.5),
                (6800, -6), (7700, -11.5), (8700, -9), (10200, -45), (11700, -17.5), (15000, -41)]
    fine = slips(rate_hz=3700, scatter_db=4, patchy_db=2.5, patch_hz=130)
    coarse = undb(-2) * slips(rate_hz=280, scatter_db=3, patchy_db=2, patch_hz=240)
    grate = tip_echo(unit(colour(fine + coarse, spectrum)))
    treble = treble_of(grate)
    body = pressed(grate - treble, modes_db=-5.5) * np.std(grate - treble)
    force = sum(movement(*move) * (body + undb(bright_db + 3) * treble) for *move, bright_db in drags)
    damped = plate(force * undb(4), ring_db=-21, spread_s=0.00088) * pan(-2)
    free = plate(grate * sweep(), ring_db=-4.5, spread_s=0.0014) * pan(-2.6)
    return damped + free


def foot_taps():
    """The plate's foot ticks on the glass; the china rings briefly."""
    # foot meets glass: start_s, level_db
    taps = [(4.361, -18), (7.8635, -25.5), (8.378, -40)]
    # modes of the china alone: pitch_hz, level_db, t60_s
    modes = [(580, 5, 0.048), (1215, -6.5, 0.04), (1340, -8, .03), (2275, -2.5, 0.04), (3040, -6.5, .04),
             (4130, -2, .04), (5200, -16, 0.04), (6250, -11, 0.045), (7310, -14, 0.045), (8500, -16.5, .04)]
    out, t = np.zeros(N), TIME[:SR // 20]
    for start_s, db in taps:
        tick = colour(rng.standard_normal(len(t)) * fade(t, .018), [(8000, 0), (10000, -15)])
        add(out, start_s, undb(db - 3) * tick)
        add(out, start_s, undb(db) * ringing(modes))
    return plate(out * undb(-2), ring_db=-21, spread_s=0.001) * pan(-2)


def kitchen(x, gap_s=0.0013, crossover_hz=350):
    """Cupboards and tiles answer after a short gap; the bass lingers longer."""
    t = TIME[:SR // 2]
    response = 0
    for band, t60_s, wet_db in (("high", 0.26, -11), ("low", 0.36, -7)):
        tail = rng.standard_normal((2, len(t))) * fade(t, t60_s) * np.clip(t / gap_s - 1, 0, 1)
        tail *= undb(wet_db) / np.linalg.norm(tail[0])
        response += signal.sosfilt(signal.butter(2, crossover_hz, band, fs=SR, output="sos"), tail)
    return x + convolve(x, response)


def mic_ports(x):
    """Each pitch reaches the two microphone ports with its own balance and phase."""
    # port differences: freq_hz, left_minus_right_db, left_lead_rad
    response = [(30, 1.5, -0.94), (100, -1, -1.44), (248, 0.5, -2.5), (470, -1.5, -4.0), (900, 3, -5.0),
                (1007, 2, -2), (1220, -8, -1), (1480, 2, 1.88), (1864, -2.5, 1), (2400, 4.5, 5),
                (3070, -2, 4), (3440, 1.5, 5), (4140, -3, 4), (5390, 3.5, 4), (5490, -1, 5.5),
                (6150, -13, 7), (7000, -5, 7), (7860, 0.5, 6.5), (8220, 4, 8), (11400, 2, 11.5)]
    size = next_fast_len(N + 4096)
    hz, *columns = np.transpose(response)
    log_hz = np.log(np.fft.rfftfreq(size, 1 / SR) + 1)
    balance_db, lead_rad = (np.interp(log_hz, np.log(hz), column) for column in columns)
    side = np.array([[1], [-1]]) / 2
    gain = undb(side * balance_db)
    gain /= np.sqrt(np.mean(gain ** 2, axis=0))
    return irfft(rfft(x, size) * gain * np.exp(1j * side * lead_rad), size)[:, :N]


def scene():
    """Work at the plate in the kitchen, plus hand rumble and background."""
    contacts = (knocks() + foot_taps() + snaps_and_smacks() + finger_ticks()
                + squeaks() + thumps() + clunks())
    cutting, friction = sawing()
    return kitchen(contacts + cutting + scrapes()) + hands(friction) + background()


def record(dry):
    """Left-right differences, treble colour, clipping at full scale, low-pass at 15.3 kHz."""
    # overall treble colour (peak near 8.7 kHz, a dip, roll-off above 14 kHz): freq_hz, gain_db
    treble_colour = [(7600, 0), (8200, -1), (8720, 5), (9150, 0), (9600, -3), (10700, -2), (11400, 0),
                     (13600, 1), (14400, -10)]
    clipped = np.clip(colour(mic_ports(dry), treble_colour), -1, 1)
    return signal.sosfilt(signal.ellip(8, .2, 70, 15300, fs=SR, output="sos"), clipped)


dry = scene()
out = record(dry)
store_wav(out)
```